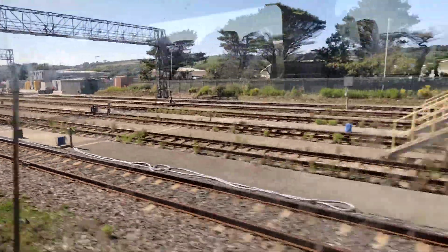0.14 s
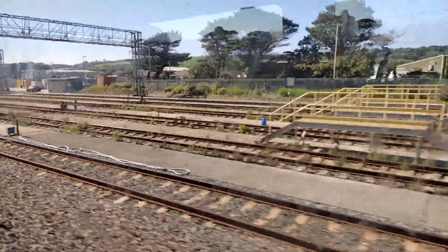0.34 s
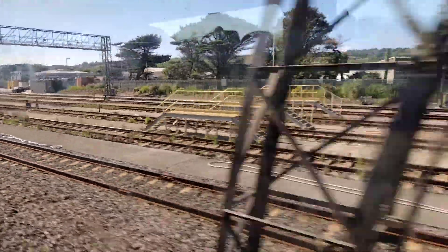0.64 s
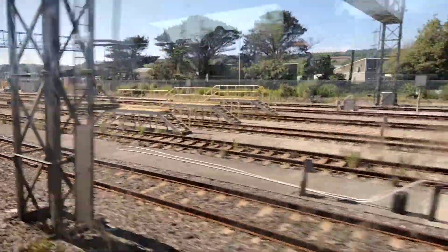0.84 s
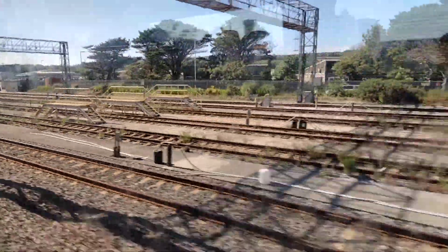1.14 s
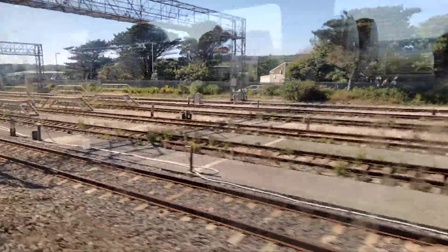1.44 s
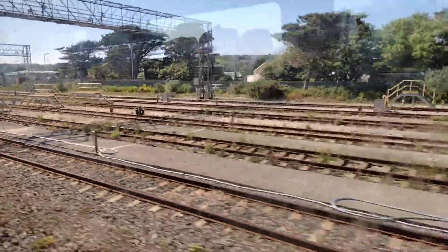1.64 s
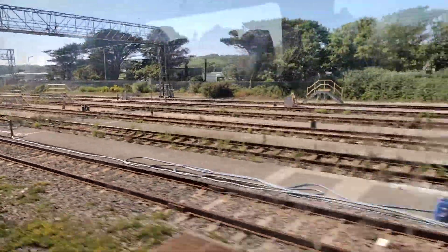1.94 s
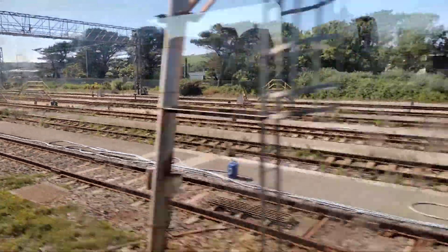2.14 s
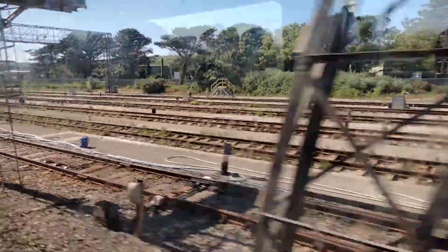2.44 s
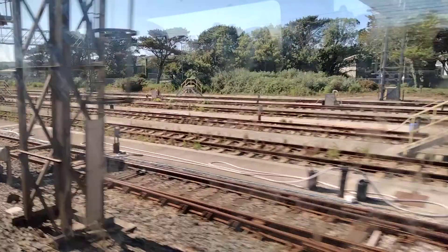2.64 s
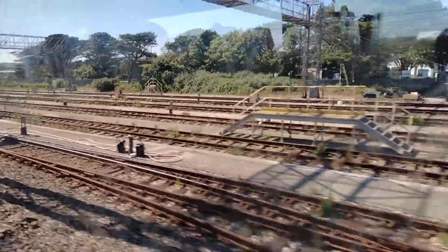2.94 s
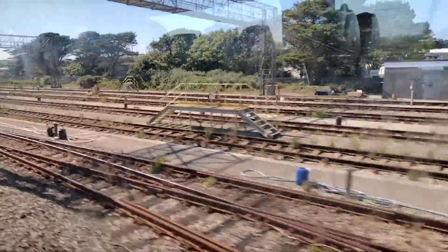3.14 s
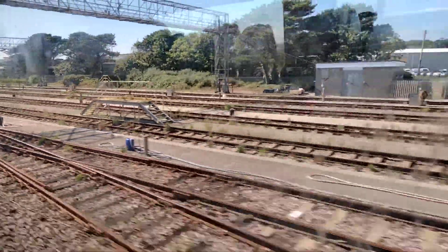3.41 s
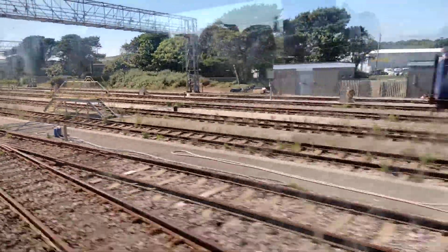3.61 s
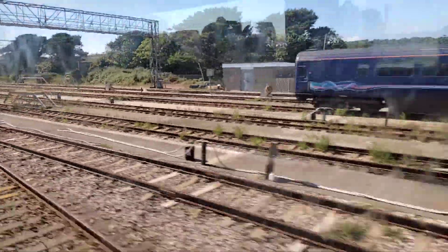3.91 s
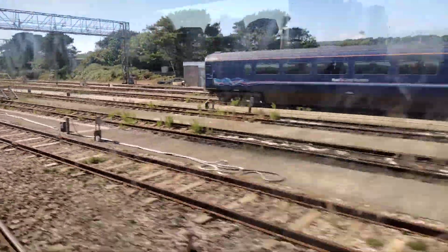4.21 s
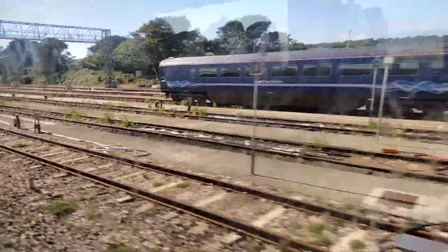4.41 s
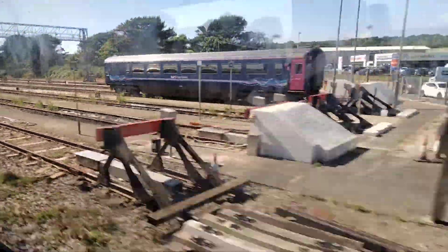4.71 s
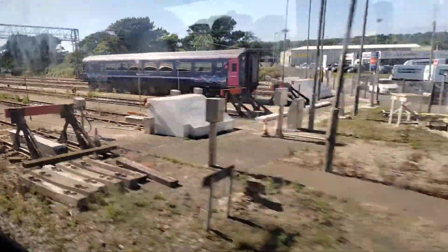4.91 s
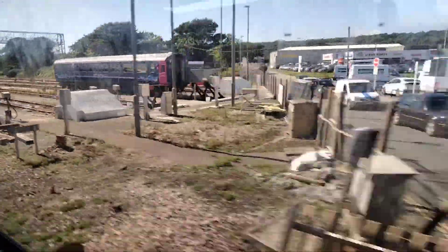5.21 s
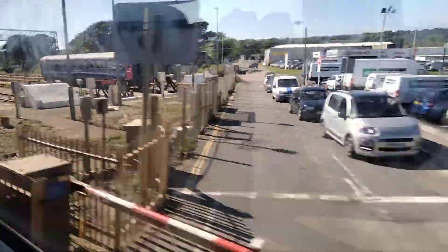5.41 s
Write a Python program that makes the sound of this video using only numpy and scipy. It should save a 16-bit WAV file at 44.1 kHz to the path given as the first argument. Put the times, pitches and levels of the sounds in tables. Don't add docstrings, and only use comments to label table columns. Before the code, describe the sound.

Inside a moving passenger coach, a very deep boom and a muffled mid-low wheel roar continue throughout, with thin rail hiss above. A low engine hum around 93 Hz swells between about 0.8 and 1.5 s, then recedes. The first two seconds are fairly even: soft hollow taps near 0.2, 1.0 and 1.5 s, a faint high squeak around 0.45 s, and a dry trim snap at 1.8 s. Sharper rustles follow at 2.1 s, with tiny creaks from 2.2 to 2.9 s. A knock at 2.75 s and a cluster of crisp rattles near 3.05 s begin the rougher stretch. Roar and shaking build from 3.3 s, peaking around 4.0-4.4 s with heavy dull knocks and a bright burst of rustling at 4.4 s. Thin squeaks pass at 4.7 and 4.9 s, a knock at 5.2 s, and the rumble eases slightly but runs on to the end at about 5.5 s.

```python
import sys
import numpy as np
from scipy import signal
from scipy.fft import rfft, irfft, next_fast_len
from scipy.io import wavfile
from scipy.ndimage import uniform_filter1d

SR = 44100
rng = np.random.default_rng(int(sys.argv[2]) if len(sys.argv) > 2 else 0)


def transcribe(u):
    v = np.clip(np.atleast_2d(u).T, -1, 1)
    q = np.round(v * 32767).astype(np.int16)
    wavfile.write(sys.argv[1], SR, q)


def invert_db(level):
    return 10 ** (np.asarray(level, dtype=float) / 20)


N = 245188

# start_s, peak_db, pitch_hz
TAPS = [(0.159, -35, 568), (0.943, -39, 654), (0.988, -39, 705), (1.024, -34, 610), (1.065, -37, 641),
        (1.485, -37, 635), (2.495, -33, 598), (3.412, -31, 686), (3.428, -29, 436), (4.277, -28.5, 615),
        (4.578, -31, 538)]


def rms_one(x):
    return x / np.sqrt(np.mean(x ** 2) + 1e-20)


def in_time(rows):
    s, *columns = np.transpose(rows)
    return [np.interp(np.arange(N) / SR, s, c) for c in columns]


def drift(rate):
    hop = 40
    r = np.exp(-2 * np.pi * rate * hop / SR)
    noise = rng.standard_normal(N // hop + 2002)
    slow = signal.lfilter([1], [1, -2 * r, r * r], noise)[2000:]
    return np.interp(np.arange(N) / hop, np.arange(len(slow)), rms_one(slow))


def resonance(x, hz, width_hz):
    r = np.exp(-np.pi * width_hz / SR)
    zeros = np.array([1, 0, -1]) * (1 - r * r) / 2
    return signal.lfilter(zeros, [1, -2 * r * np.cos(2 * np.pi * hz / SR), r * r], x)


def colour(x, spectrum):
    size = next_fast_len(len(x))
    hz, db = np.transpose(spectrum)
    octaves = np.log2(np.r_[hz[0] * .8, hz, hz[-1] * 1.15, hz[-1] * 2])
    levels_db = np.r_[db[0] - 40, db, db[-1] - 40, db[-1] - 120]
    bins = np.log2(np.arange(size // 2 + 1) * SR / size + 1e-3)
    gain = invert_db(np.interp(bins, octaves, levels_db))
    return rms_one(irfft(rfft(x, size) * gain, size)[:len(x)])


def grit(per_s, spread_db, share):
    sizes = invert_db(spread_db * np.minimum(rng.exponential(1, N), 5)) * rng.choice([-1, 1], N)
    contacts = rms_one(sizes * (rng.random(N) < per_s / SR))
    return np.clip(share, 0, 1) * contacts + rng.standard_normal(N)


def steady(x, seconds):
    window = round(seconds * SR)
    power = uniform_filter1d(uniform_filter1d(x ** 2, window), window)
    return rms_one(x / np.sqrt(power + 0.064))


def shaken(parts, control_db, events):
    reach_octaves = 0.92
    t = np.arange(0, N, 64) / SR
    s, swing_db, pitch_hz, length_s = np.transpose(events)[:, :, None]
    bumps = swing_db * np.exp(-(2 * (t - s) / np.maximum(length_s, .01)) ** 2)
    gains = []
    for hz, db, share in parts:
        nearness = np.exp(-(np.log2(pitch_hz / hz) / reach_octaves) ** 2)
        swing = np.interp(np.arange(N) / SR, t, np.sum(bumps * nearness, axis=0))
        gains.append(invert_db(db + share * control_db + swing))
    return gains


def gaps():
    gap_s, depth = .006, .75
    t = np.arange(N) / SR
    return np.prod([1 - depth * np.exp(-((t - s) / gap_s) ** 2) for s, *_ in TAPS], axis=0)


def engine():
    # pitch_hz, level_db
    hum = [(93.5, -47.5), (277, -85), (349.9, -59.5), (554.5, -59.5), (694.4, -59), (969.0, -83)]
    # time_s, level_db
    pull = [(0.0, -5), (.3, -4), (.6, -11), (.8, 6), (1.0, -0.5), (1.3, 7.5), (1.55, 4), (1.7, -9),
            (2.1, -4), (2.4, -14), (3.0, -12), (4.4, -13), (5.56, -10)]
    turns = np.cumsum(1 + 0.0014 * drift(2.06)) / SR
    orders = []
    for hz, db in hum:
        strength = np.sqrt(2) * invert_db(db + 3.0 * drift(0.68))
        orders.append(strength * np.sin(2 * np.pi * (hz * turns + rng.random())))
    return invert_db(in_time(pull)[0]) * orders[0] + sum(orders[1:])


def coach_body(rough, bounce_db):
    # freq_hz, level_db_per_hz
    boom = [(14, 31.5), (23, 6.5), (31, 6.5), (39, 17), (50, -6)]
    throb = [(52, 5), (66, 4), (79, -1.5), (93, 4.5), (108, -18.5)]
    drumming = [(108, -2.5), (135, -7), (150, -1.5), (190, -16)]
    buzz = [(190, -0.5), (225, 4), (250, -3), (275, 1.5), (295, -32)]
    # centre_hz, plain_line_db, share of the bounce followed
    body_parts = [(35, -34, 0.56), (68, -39.5, 1.19), (140, -48.5, 1.55), (230, -54.5, 1.32)]
    # time_s, swing_db, pitch_hz, length_s
    jolts = [(0.167, 5, 153, 0.16), (0.446, 13, 116, 0.077), (0.544, 12.5, 140, 0.075), (.97, -3, 35, 0.13),
             (1.194, 4, 68, 0.074), (1.338, 3.5, 90, 0.19), (1.482, -8.5, 35, 0.16),
             (1.805, -2.5, 35, 0.15), (1.81, 10.5, 68, 0.097), (2.833, 8, 163, 0.14),
             (2.99, 14.5, 116, 0.061), (3.092, 18.5, 125, 0.11), (3.26, 8.5, 68, 0.059),
             (3.352, 10, 56, 0.055), (3.423, 8, 177, 0.12), (3.684, 9, 127, 0.038), (4.09, 6, 180, 0.34),
             (4.305, 6.5, 153, 0.044), (4.496, -5, 230, 0.18), (4.691, 8, 156, 0.045),
             (4.741, 9.5, 68, 0.14), (4.71, -3.5, 35, 0.093), (4.89, 7.5, 35, 0.12),
             (5.117, -5, 140, 0.029), (5.22, -2, 35, 0.044), (5.32, 8, 40, 0.076), (5.375, -1, 35, .05),
             (5.492, -21, 103, 0.064), (5.45, 6.5, 91, 0.29), (3.759, 12.5, 118, 0.06), (.63, 4, 30, 0.17),
             (1.21, -2.5, 28, 0.16), (1.68, 2.5, 28, 0.42), (1.894, -5, 80.4, 0.17), (2.4, 2, 30, 0.2),
             (3.4, 3, 28, .14), (4.02, 3.5, 28, 0.23), (4.3, 3.5, 28, 0.1), (5.18, 2, 39.8, 0.21),
             (1.077, 0, 150, .17), (3.913, -1.5, 150, 0.099), (0.528, -4.5, 260, 0.1),
             (0.814, 5, 240, 0.13), (3.07, -8, 280, .1), (5.18, -3, 250, .08), (5.354, 2.5, 75, 0.064),
             (2.297, -1.5, 80, 0.27), (4.242, -2, 149, 0.13), (1.76, -3, 65, 0.18), (.25, -2, 150, .2),
             (.45, 3.5, 150, 0.055)]
    gains = shaken(body_parts, bounce_db, jolts)
    spectra = (boom, throb, drumming, buzz)
    return sum(gain * steady(colour(rough, part), seconds=0.092) for gain, part in zip(gains, spectra))


def wheel_roar(rough, roughness_db):
    # freq_hz, level_db_per_hz
    low_roar = [(290, -1.5), (320, -2.5), (356, 1), (425, -1), (470, -7.5)]
    main_roar = [(470, -2), (520, 1.5), (575, 1.5), (640, 0.5), (700, -3), (800, -18)]
    upper_roar = [(780, 3.5), (900, 0), (1000, 3.5), (1250, -7)]
    rail_hiss = [(710, -32), (1200, -0.5), (1580, -3), (2080, -5), (2390, -10), (3200, -16.5), (4160, -26),
                 (7040, -120)]
    # centre_hz, plain_line_db, share of the roughness followed
    wheel_parts = [(360, -57, 1.37), (600, -53, 1.245), (1010, -55, 0.51), (1370, -60.5, 0.97)]
    # time_s, swing_db, pitch_hz, length_s
    bites = [(0.487, 3.5, 620, 0.15), (1.05, 7, 644, 0.051), (1.624, 3.5, 795, 0.26),
             (2.5, 6.5, 480, 0.072), (2.622, -9, 600, 0.061), (2.657, 8.5, 360, 0.067),
             (2.763, 8, 600, 0.093), (2.966, -6, 910, 0.033), (3.018, 9.5, 360, 0.046),
             (3.088, 7, 1200, 0.039), (3.136, 5, 545, 0.13), (3.356, 8.5, 483, 0.037),
             (3.467, 6.5, 497, 0.12), (3.647, -4.5, 600, 0.084), (3.688, 12.5, 450, 0.041),
             (3.777, 11, 600, 0.034), (3.846, 5, 360, 0.041), (4.095, 4.5, 480, 0.13),
             (4.223, -4, 600, 0.064), (4.298, 6, 400, 0.056), (4.395, 5.5, 730, 0.073),
             (4.522, -11, 480, 0.083), (4.606, 10, 630, 0.053), (4.712, 8, 570, 0.14),
             (5.12, -5.5, 600, .08), (5.2, 6.5, 700, 0.067), (3.914, 4, 1500, 0.062),
             (1.804, -1.5, 1700, .06), (5.444, -9.5, 550, 0.098), (0.377, -5, 400, 0.11),
             (.87, -1, 330, .06), (1.15, 2, 320, 0.11), (3.2, 0.5, 330, .08), (4.69, -5, 300, .19),
             (5.006, -4, 320, 0.15), (5.256, -3.5, 300, .12), (4.547, -1.5, 1090, 0.063),
             (3.62, -2, 1600, 0.06), (0.457, 3, 600, 0.037), (0.52, 3.5, 650, 0.026),
             (3.294, -4, 1800, 0.076)]
    low, roar, upper, rail = shaken(wheel_parts, roughness_db, bites)
    contact = gaps()
    lurch = drift(1.7)
    out = low * steady(colour(rough, low_roar), seconds=0.33)
    out += roar * contact * invert_db(.4 * lurch + drift(25)) * steady(colour(rough, main_roar), seconds=.05)
    out += upper * contact * invert_db(0.13 * lurch) * colour(rough, upper_roar)
    return out + rail * invert_db(0.6 * lurch) * colour(rng.standard_normal(N), rail_hiss)


def running_gear():
    # pitch_hz, width_hz, level_db
    panels = [(37, 57, 11), (106.6, 49, -2), (605, 160, -8.5), (714, 54, -15.5), (910, 200, -12.5)]
    # time_s, roughness_db, bounce_db
    track = [(0.0, -1.2, -3), (.15, 0.6, 1), (.6, 0.5, -1.4), (1.1, -1, 0.9), (1.6, 0, -0.2),
             (2.1, 0.3, 1.2), (2.45, 1.1, 0.5), (2.7, 2, 0.3), (3.0, 1, 0), (3.3, 4.5, 1), (3.6, 5.5, 3.5),
             (3.9, 7, 6), (4.2, 9, 9.5), (4.45, 7, 8.5), (4.7, 6, 6.5), (5.05, 4, 4.5), (5.3, 4.5, 2.5),
             (5.56, 2.5, 3)]
    rough = grit(900, spread_db=4.0, share=0.31)
    rough = rough + sum(invert_db(db) * np.sqrt(hz / wide) * resonance(rough, hz, wide) for hz, wide, db in panels)
    roughness_db, bounce_db = in_time(track)
    return coach_body(rough, bounce_db) + wheel_roar(rough, roughness_db)


def knocks():
    # start_s, peak_db, pitch_hz, t60_s
    joints = [(0.502, -54, 635, 0.26), (1.023, -53, 610, 0.14), (1.059, -51, 656, 0.33),
              (2.496, -46, 590, 0.28), (2.744, -31, 600, 0.067), (3.166, -34.5, 605, 1),
              (3.412, -33, 520, 0.2), (3.683, -43, 576, 0.18), (3.776, -47, 656, 0.18),
              (4.019, -27, 460, 0.24), (4.099, -32.5, 457, 0.26), (4.276, -45, 619, 0.2),
              (4.362, -39, 585, 0.29), (4.599, -35.5, 570, 0.19), (4.686, -35, 619, 0.18),
              (5.19, -35.5, 636, 0.12)]
    out, t = np.zeros(N), np.arange(SR // 4) / SR
    for s, db, hz, t60 in joints:
        puff = rng.standard_normal(len(t)) * invert_db(-60 * t / max(t60, .02))
        puff[0] += 25.0
        ring = resonance(puff, hz, width_hz=630) + 0.65 * resonance(puff, 1.85 * hz, width_hz=430)
        ring = resonance(resonance(ring, hz, 600), hz, 600)
        at = round(s * SR)
        out[at:at + len(t)] += (invert_db(db + 2.0) * ring / np.abs(ring).max())[:N - at]
    return out


def taps():
    rise_s, trim_db = .0018, -1
    out, t = np.zeros(N), np.arange(SR // 50) / SR
    for s, db, hz in TAPS:
        at = round(s * SR)
        swell = t / rise_s * np.exp(1 - t / rise_s)
        out[at:at + len(t)] += invert_db(db + trim_db) * swell * np.sin(2 * np.pi * hz * t)
    return out


def whispers():
    # start_s, length_s, pitch_hz, width_hz, level_db
    breaths = [(3.27, .24, 11550, 700, -69), (3.27, .22, 14300, 900, -74), (3.29, .04, 9350, 120, -60),
               (1.03, .12, 11400, 900, -76), (1.16, .2, 11600, 900, -77), (3.89, 0.11, 4900, 150, -62),
               (4.385, .19, 4430, 180, -62), (4.79, .09, 14600, 1500, -66), (4.465, .03, 14500, 1500, -64),
               (4.13, .03, 4100, 300, -64), (.28, .1, 4400, 500, -75), (4.395, .05, 9500, 500, -46),
               (4.415, .05, 7050, 200, -58), (3.076, .015, 4200, 250, -55), (3.03, .025, 3300, 150, -70),
               (1.779, .012, 12000, 400, -58), (1.778, .014, 5000, 1600, -52),
               (1.632, .012, 4200, 900, -63), (3.5, .1, 5870, 170, -63), (1.779, .035, 5400, 2500, -50),
               (1.02, .24, 7000, 2500, -71), (1.035, .05, 680, 70, -46), (.5, .04, 660, 70, -48),
               (5.17, .06, 700, 80, -43), (5.17, .05, 1000, 80, -50), (2.1, .04, 6100, 200, -73),
               (2.845, .02, 5500, 250, -68), (3.056, .04, 13200, 1200, -56)]
    out = np.zeros(N)
    for s, length_s, hz, width_hz, db in breaths:
        shape = np.linspace(0, 1, round(length_s * SR))
        breath = resonance(rng.standard_normal(SR // 4), hz, width_hz)
        breath = rms_one(resonance(breath, hz, width_hz))[:len(shape)]
        at = round(s * SR)
        out[at:at + len(shape)] += invert_db(db) * np.sin(np.pi * shape ** 0.46) * breath
    return out


def squeaks():
    # start_s, length_s, pitch_hz, arch_hz, level_db
    clear = [
        (.44, 0.12, 8400, 799, -61.5),
        (0.32, 0.07, 7650, 60, -71),
        (4.67, 0.04, 9050, 62, -52),
        (4.9, .03, 10250, 0, -59),
    ]
    # start_s, length_s, pitch_hz, slide_hz, level_db
    harsh = [
        (2.27, .06, 2920, -60, -65),
        (2.71, .03, 3780, -70, -65),
        (2.275, .04, 5760, -200, -67),
        (2.795, .05, 5690, -30, -65),
        (2.845, .02, 5640, 60, -65),
        (2.205, .05, 3650, 140, -72),
        (2.39, .07, 3780, -140, -73),
        (2.44, .1, 3580, -90, -73),
        (2.7, .035, 5700, 0, -69),
        (5.505, .06, 3740, 20, -66),
    ]
    clear_fall_db, harsh_fall_db = 30, 10
    shake, shake_ref_hz = .007, 9500
    out, shaky, flutter = np.zeros(N), drift(150), drift(90)
    rubs = [(*row, 0, clear_fall_db) for row in clear]
    rubs += [(*row, 0, db, slide_hz, harsh_fall_db) for *row, slide_hz, db in harsh]
    for s, length_s, hz, arch_hz, db, slide_hz, fall_db in rubs:
        at = round(s * SR)
        swell = np.sin(np.linspace(0, np.pi, round(length_s * SR)))[:N - at]
        span = slice(at, at + len(swell))
        pitch_hz = hz * (1 + shake * max(hz / shake_ref_hz, 1) ** 2 * shaky[span])
        bend_hz = arch_hz * swell + np.linspace(0, slide_hz, len(swell))
        phase = 2 * np.pi * np.cumsum(pitch_hz + bend_hz) / SR
        overtones = range(int(13000 / hz) or 1)
        tone = sum(invert_db(-fall_db * k) * np.sin((k + 1) * phase) for k in overtones)
        out[span] += invert_db(db + 4 * flutter[span]) * swell ** .6 * tone
    return out


def trim():
    # freq_hz, level_db_per_hz
    sharp = [(6300, -26), (7300, -4), (8000, 3.5), (8700, 8), (9500, 2.5), (10200, -6.5), (11000, -20.5)]
    dull = [(900, -7), (1600, 0.5), (2300, -3.5), (3000, -3.5), (4400, 0), (5500, -0.5), (6500, 1),
            (7300, -3)]
    airy = [(10500, -2), (11500, 0), (12600, -1.5), (13600, -1), (14600, -1.5), (15250, 3), (15550, 0)]
    # time_s, level_db
    chafe = [(0.0, -67), (0.29, -73), (0.5, -65), (0.77, -73), (1.21, -68.5), (1.35, -70), (2.14, -71),
             (2.32, -63.5), (2.49, -70), (2.76, -66.5), (3.44, -61), (3.78, -59.5), (3.97, -51),
             (4.17, -58.5), (4.46, -52), (4.58, -57), (5.25, -63), (5.56, -64.5)]
    # start_s, peak_db, dull_db, airy_db, t60_s
    shakes = [(0.2688, -57, -7, -19, 0.87), (1.5978, -50.5, -2, -17, 0.38), (1.7804, -36, -7, -15, .11),
              (2.109, -36.5, -16, -19, 0.074), (2.1929, -48.5, -15, -23, 0.69),
              (2.3094, -46, -21, -19, 0.1), (2.732, -41.5, -8.5, -18, 0.26), (3.053, -37.5, -5.5, -16, 0.2),
              (3.064, -39, -10, -12, 0.15), (3.077, -35.5, -14, -13, 0.1), (3.488, -39, -12.5, -21, 0.61),
              (3.679, -35, -10, -19, 0.31), (3.881, -33, -14, -16, 0.79), (3.918, -34, -10.5, -21, 0.66),
              (4.1194, -42, -8.5, -17, 0.6), (4.3, -40, -20, -22, 0.15), (4.815, -47, -14, -16, 0.27),
              (5.0294, -49, -4.5, -10, 0.28), (5.2869, -49.5, -8.5, -25, 0.33)]
    # start_s, peak_db, dull_db, airy_db
    more_shakes = [(0.1416, -58, -18, -19), (1.6354, -48, -7, -21), (1.7695, -44, -8, -20),
                   (1.7733, -41, -9, -24), (3.036, -46, -25, -25), (5.288, -50.5, -12, -20),
                   (2.0203, -64, -12, -14), (2.1176, -42.5, -7.5, -15), (2.843, -52, 0, -25),
                   (2.855, -51, -3, -21), (3.9, -39, -14, -8), (3.925, -42, -14, -8), (4.965, -56, -11, -9.5),
                   (2.275, -52, -16, -20), (5.01, -54, -3, -8), (4.88, -56, -14, -8), (3.1644, -52, -11, -10),
                   (3.1794, -56, -5, -15), (3.2705, -51, -30, -22), (3.7694, -44.5, -9.5, -10),
                   (3.8501, -53, -18, -14), (4.0706, -39, -13, -17), (4.2517, -49, -18, -15),
                   (4.3424, -39, -12, -13), (4.41, -38, -12, -25), (4.4794, -53, -35, -22),
                   (4.5994, -48, -6, -17), (4.845, -45, -16, -12), (4.7994, -54, -14, -3),
                   (4.4594, -50, -16, -16)]
    # start_s, peak_db, dull_db, rise_s, t60_s
    sways = [(.0, -64, -21, 0.038, 0.26), (.33, -67, -14, 0.019, 0.13), (.6, -56.5, -11, 0.05, 0.82),
             (1.02, -52, -21, 0.079, .5), (1.16, -52.5, -13, .05, 0.52), (1.28, -56, -11, 0.061, .2),
             (2.21, -54, -12, 0.022, .25), (2.4, -51.5, -12, 0.027, 0.68), (2.46, -51.5, -7, 0.033, 0.37),
             (3.29, -46.5, -32, 0.031, 0.48), (4.06, -52, -18, .01, .1), (4.385, -31, -16, 0.022, 0.53),
             (4.765, -46, -5, 0.032, 0.83), (4.9, -45, -19, 0.02, 0.52), (5.45, -49.5, -11, 0.055, .6)]
    snap_rise_s, shared_t60_s, sway_airy_db = .0042, 0.17, -21.5
    creep_s, creep_db = .02, -17
    haste = np.array([[1], [1], [1.34]])

    chafe_db, = in_time(chafe)
    swing_db = chafe_db + 67
    levels = np.array([chafe_db, -70 + 0.82 * swing_db, -75 + 0.66 * swing_db])
    power = invert_db(levels) ** 2 * invert_db(0.74 * drift(27))
    bursts = [(*row, snap_rise_s, t60) for *row, t60 in shakes]
    bursts += [(*row, snap_rise_s, shared_t60_s) for row in more_shakes]
    bursts += [(*row, sway_airy_db, rise, t60) for *row, rise, t60 in sways]
    t = np.arange(SR // 2) / SR - creep_s
    for s, db, dull_db, airy_db, rise, t60 in bursts:
        creep = invert_db(2 * creep_db) * np.clip(1 + t / creep_s, 0, 1) ** 2
        onset = np.maximum(creep, np.clip(t / max(rise, .001), 0, 1) ** 2)
        burst = onset * invert_db(-120 * haste * np.maximum(t - rise, 0) / max(t60, .02))
        peaks = invert_db([[db - 9.0], [db + dull_db - 4.5], [db + airy_db - 0.5]]) ** 2
        at = max(round((s - .002 - creep_s) * SR), 0)
        power[:, at:at + len(t)] += (peaks * burst)[:, :N - at]
    power *= invert_db(1.8 * drift(125))
    contacts = grit(2500, spread_db=0.5, share=0.21)
    return sum(np.sqrt(p) * colour(contacts, part) for p, part in zip(power, (sharp, dull, airy)))


def scene():
    coach = running_gear() + engine() + gaps() * knocks() + taps()
    return (coach + trim() + squeaks() + whispers())[None]


def drop_faint(x):
    faint_db, from_hz, follows = -100.5, 12900, .6
    hz, _, lines = signal.stft(x, SR, nperseg=2048, noverlap=1024)
    treble_power = np.mean(np.abs(lines[0, hz > from_hz - 1500]) ** 2, axis=0)
    treble_db = 10 * np.log10(treble_power + 1e-20)
    edge_db = np.clip((from_hz - hz) / 150, 0, 60) + np.clip((hz - 14900) / 120, 0, 60)
    rise_db = follows * (treble_db - np.percentile(treble_db, 20))
    limit = invert_db(faint_db - edge_db[:, None] + rise_db)
    return signal.istft(lines * (np.abs(lines) > limit), SR, nperseg=2048, noverlap=1024)[1][:, :N]


def low_pass(x):
    return signal.sosfilt(signal.butter(12, 15680, fs=SR, output="sos"), x)


def record(dry):
    port = dry + (invert_db(1.5) - 1) * resonance(dry, hz=8860, width_hz=220)
    port = signal.sosfilt(signal.cheby2(20, 50, 15700, fs=SR, output="sos"), port)
    return low_pass(drop_faint(port))


dry = scene()
out = record(dry)
transcribe(out)
```